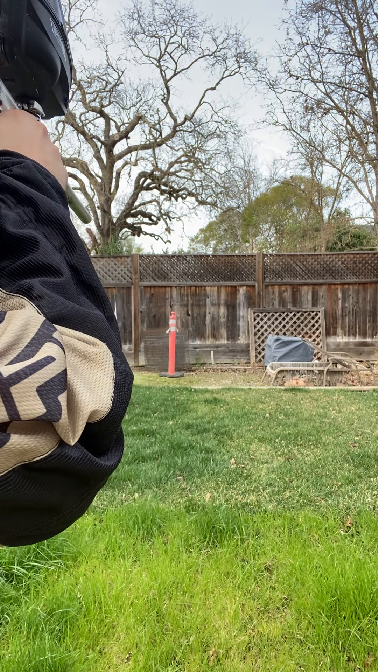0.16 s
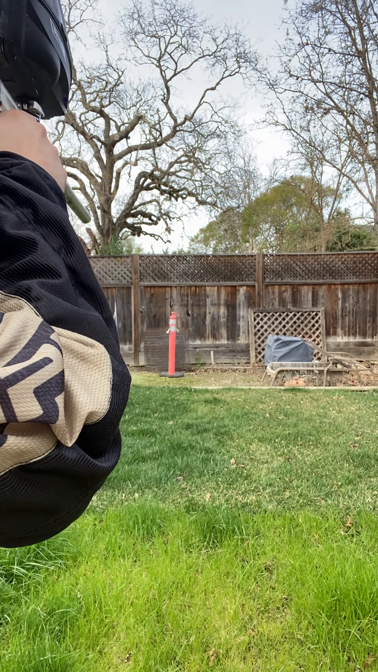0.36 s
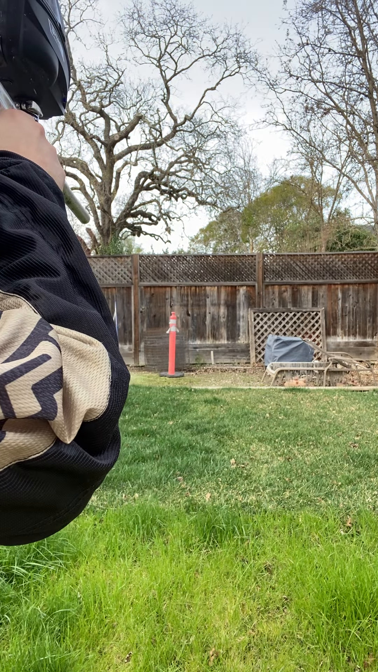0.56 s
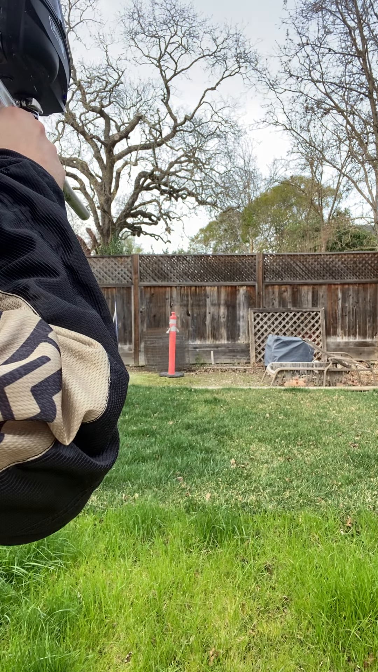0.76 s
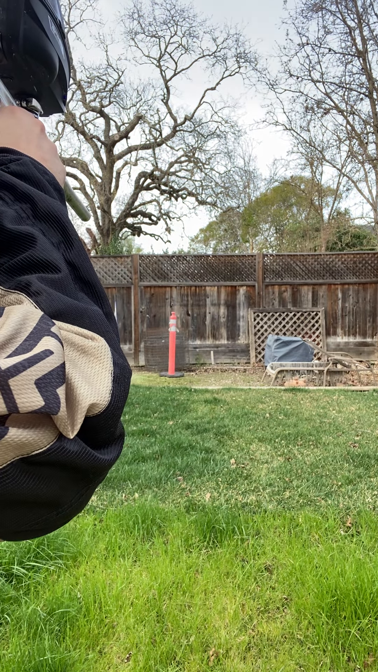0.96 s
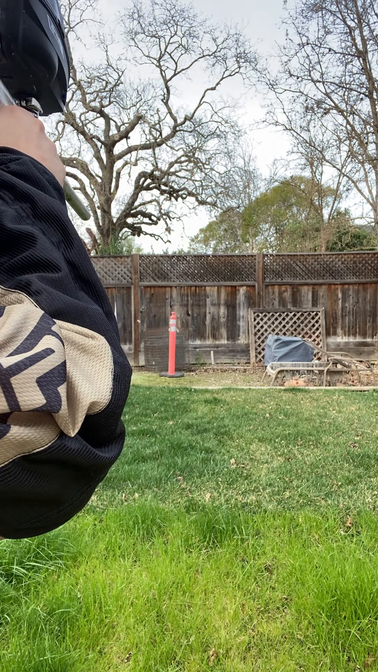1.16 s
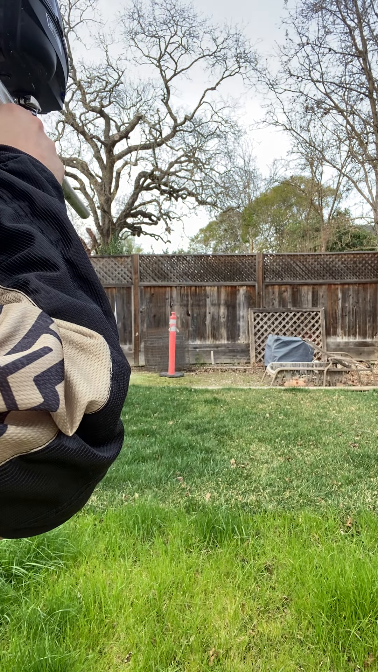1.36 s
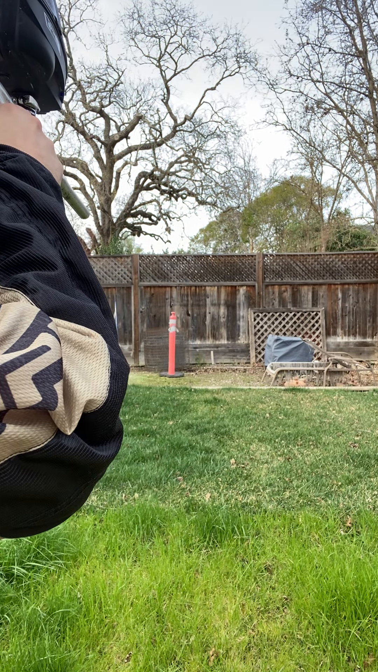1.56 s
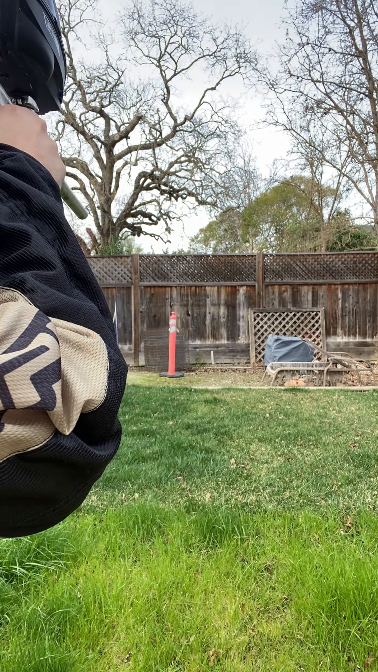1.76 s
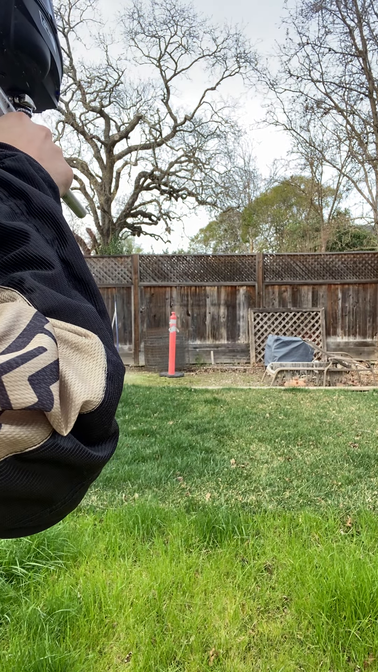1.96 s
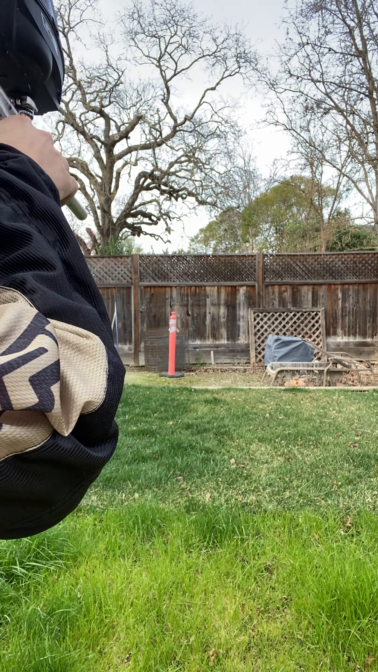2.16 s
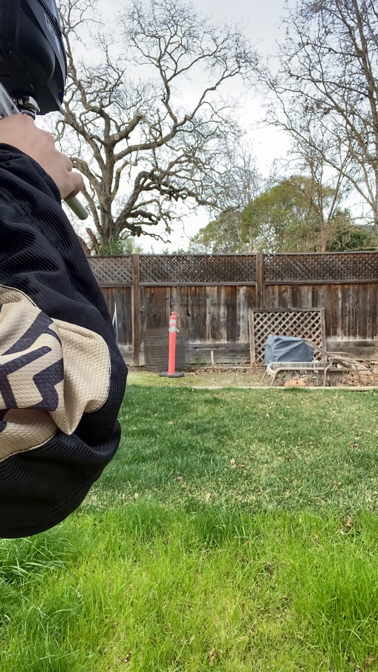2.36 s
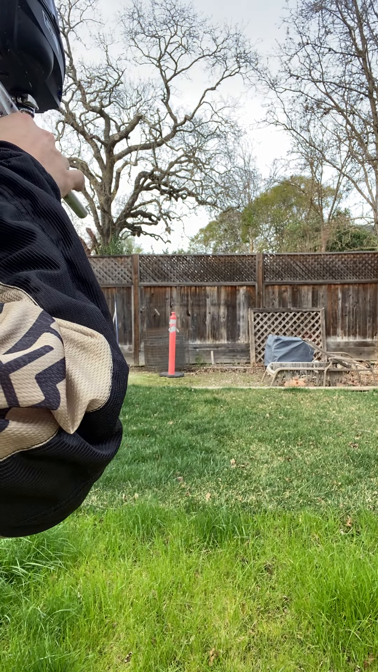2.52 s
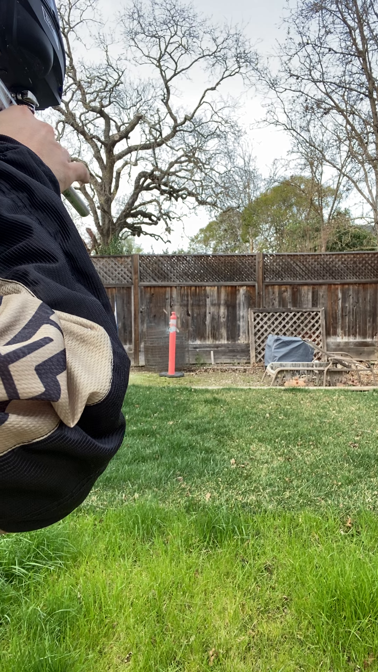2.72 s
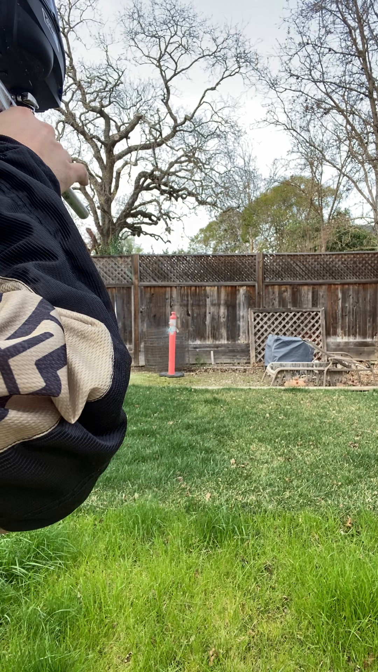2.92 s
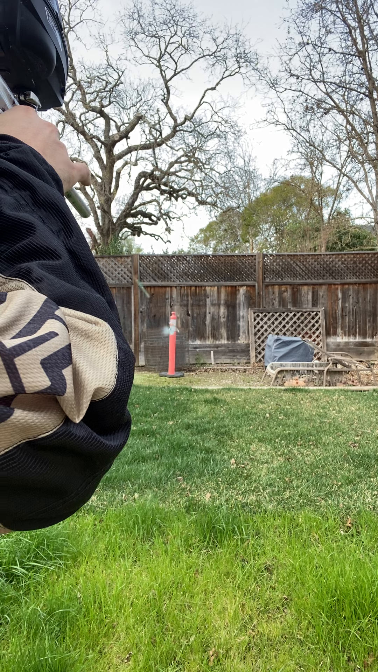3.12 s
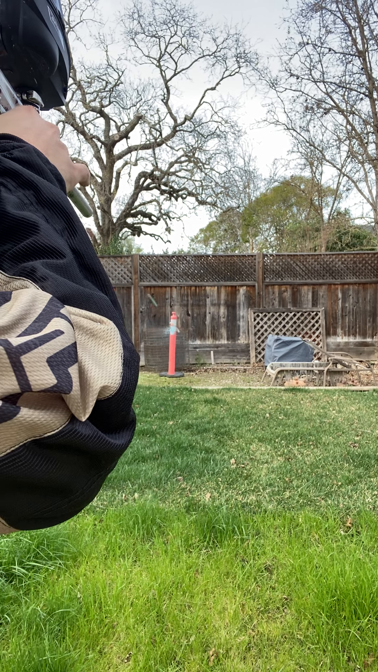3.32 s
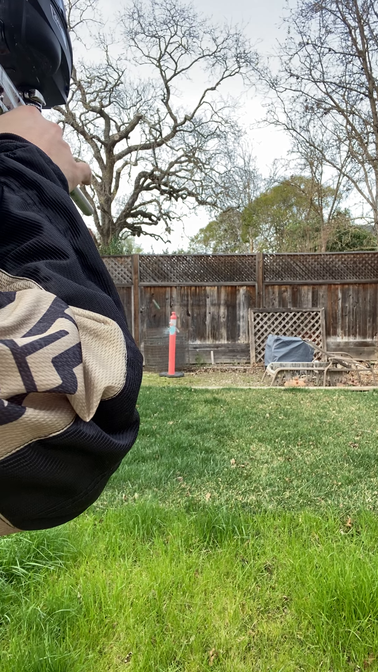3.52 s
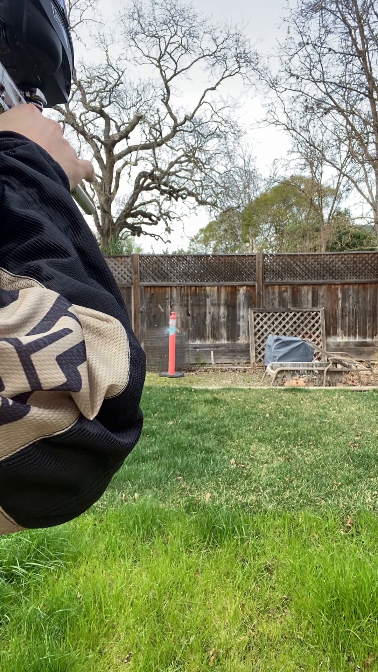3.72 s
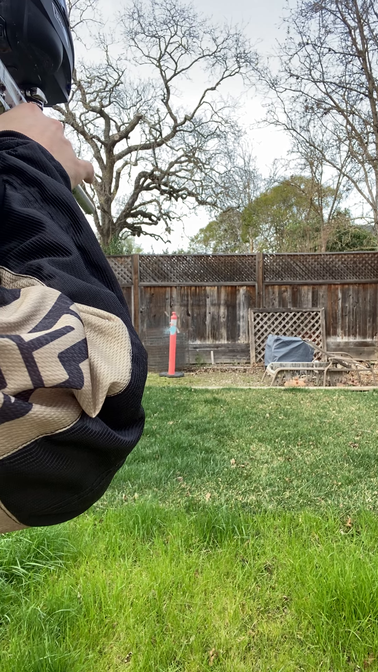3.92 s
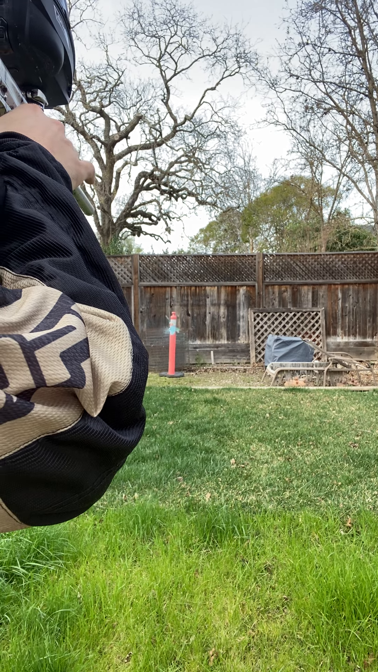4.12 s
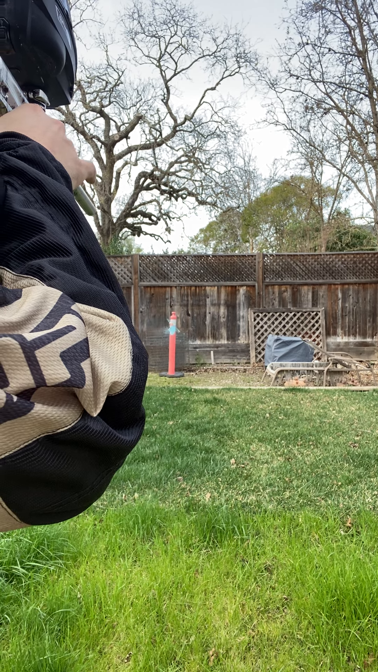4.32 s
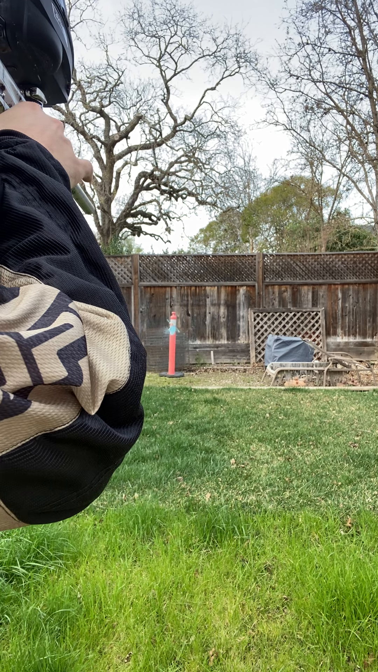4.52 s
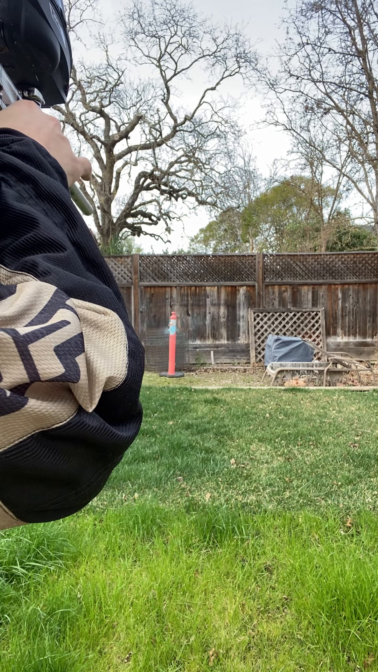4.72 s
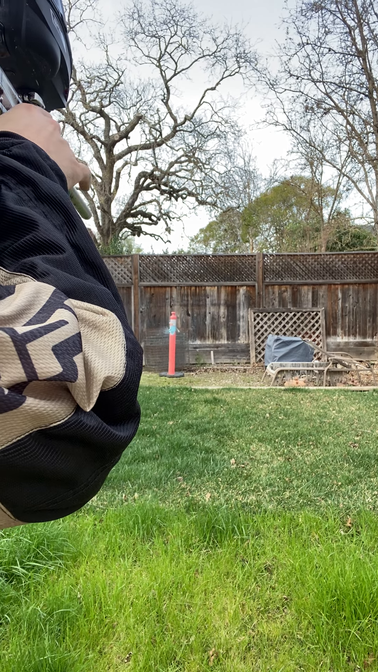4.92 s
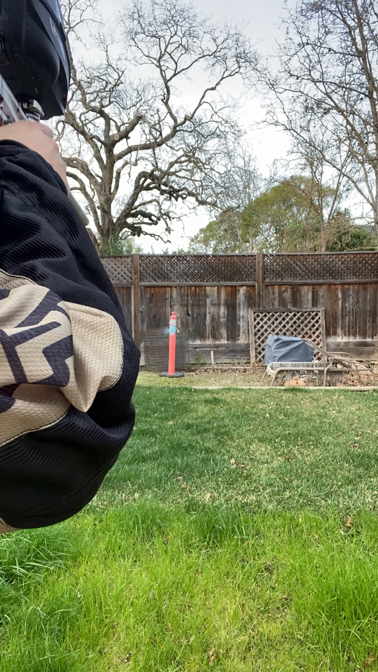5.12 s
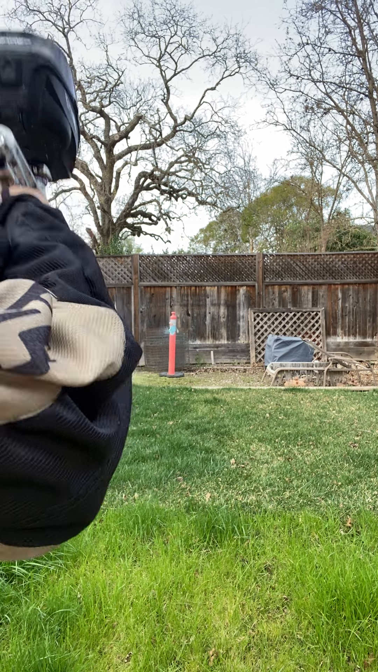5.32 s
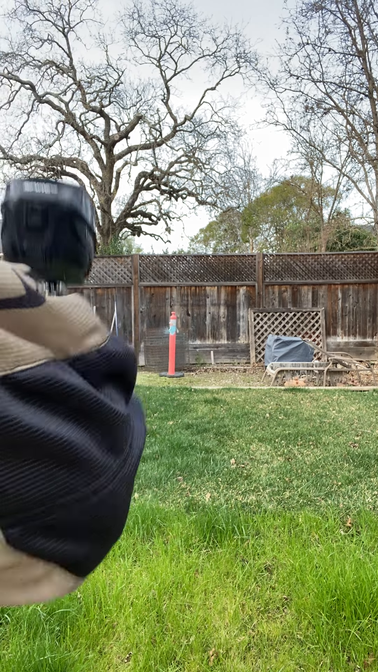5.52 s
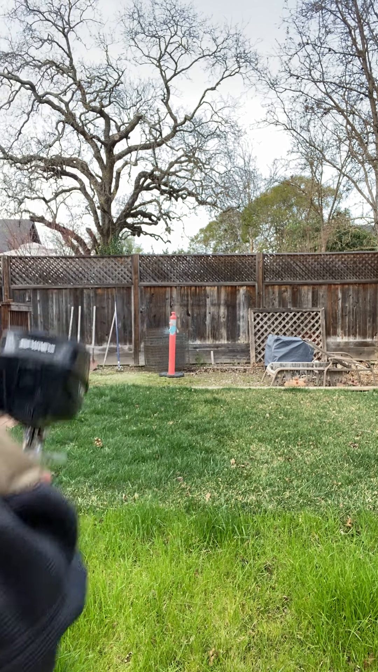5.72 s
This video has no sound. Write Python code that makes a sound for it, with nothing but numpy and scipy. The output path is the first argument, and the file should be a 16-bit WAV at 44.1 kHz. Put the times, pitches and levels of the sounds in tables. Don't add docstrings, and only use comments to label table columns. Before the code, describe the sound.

Outdoors in a fenced yard, a paintball marker beside the microphone fires two single shots, each a click, hollow gas pop and bright metallic slam, followed by a splat and knock on distant planks. After a pause comes a rapid, even string of shots at about ten per second, overlapping with fence hits and echoes. It stops abruptly, leaving faint hum, then a sleeve rub and balls rattling in the plastic hopper.

```python
import sys
import numpy as np
from scipy import signal
from scipy.fft import rfft, irfft, next_fast_len
from scipy.io import wavfile
from scipy.ndimage import uniform_filter1d

SR = 44100
rng = np.random.default_rng(int(sys.argv[2]) if len(sys.argv) > 2 else 0)


def gain_from_decibels(decibels):
    exponent = np.asarray(decibels, float) / 20
    return 10 ** exponent


def unload_wav(signal):
    wavfile.write(
        sys.argv[1],
        SR,
        np.round(np.clip(np.atleast_2d(signal).T, -1, 1) * 32767).astype(np.int16),
    )


N = 259087
LEAD = next_fast_len(N + SR // 10, True) - N
M = N + LEAD
HZ = np.fft.rfftfreq(M, 1 / SR)
T = np.arange(M) / SR
NOW = T - LEAD / SR

# start_s [s], slam_db [dB], latch_db [dB]
SHOTS = [(0.756, -12, -6), (1.3553, -6.5, -5.5), (2.5724, -10.5, -6.5), (2.6673, -9.5, -10.5),
         (2.7626, -11, -13), (2.9052, -10, -10.5), (3.0057, -11, -11), (3.1005, -11.5, -10.5),
         (3.1965, -7.5, -12), (3.2924, -8, -11), (3.3883, -7.5, -12), (3.483, -8, -12), (3.5837, -9, -11),
         (3.6788, -8.5, -12), (3.7745, -8, -11.5), (3.8689, -12, -13), (3.9655, -10, -12),
         (4.0613, -7.5, -15), (4.1572, -8.5, -13), (4.252, -9, -15), (4.348, -9, -11.5),
         (4.4434, -10.5, -15), (4.5398, -6.5, -12), (4.635, -10.5, -14), (4.7297, -10.5, -11)]


def marker():
    return latch_click() + gas_pop() + bolt_slam()


def latch_click():
    # pitch_hz [Hz], level_db [dB per Hz]
    click_colour = [(710, -23), (1200, -8.5), (2390, 0.5), (3010, -8), (4100, -9.5), (5050, -18.5),
                    (6430, -5), (8450, -16.5), (12500, -12), (14600, -19.5), (16500, -43.5)]
    # pitch_hz [Hz], level_db [dB], t60_s [s]
    body = [(316, -1.5, 0.055), (600, -2.5, 0.017), (870, 3.5, 0.0067), (1960, -8.5, 0.0093)]
    s, _, latch_db = np.transpose(SHOTS)
    click_s = s - 0.0296
    click = train(click_s, latch_db - 0.5, fall(0.0073)) + train(click_s, latch_db - 9.5, fall(0.075))
    inrush = train(click_s, latch_db + 2.0 - 0.46 * drain(s), pop(1280, 374, 0.0025, 0.0075))
    return click * noise(click_colour) + train(click_s, latch_db - 9.5, ring(body)) + inrush


def gas_pop():
    # before_slam_s [s], level_db [dB]
    puffs = [
        (0.013, -4.5),
        (0.0097, -0.5),
        (0.0044, -13),
    ]
    # pitch_hz [Hz], level_db [dB], t60_s [s]
    barrel = [(695, 1.5, 0.016), (898, -2.5, 0.018), (1500, -6.5, 0.013)]
    # pitch_hz [Hz], level_db [dB per Hz]
    gas_colour = [(710, -27.5), (1200, -10.5), (2370, -15), (2670, -9.5), (3220, -30.5), (3880, -9.5),
                  (5220, -18.5), (6570, -13.5), (12100, -20), (15800, -20), (16500, -39.5)]
    # pitch_hz [Hz], level_db [dB], t60_s [s]
    recoil = [(68, -16, 0.21), (124.2, -2, 0.058), (198.2, 4.5, 0.025)]
    # pitch_hz [Hz], level_db [dB], t60_s [s]
    frame = [(326, -10, 0.08), (470, -7.5, 0.011), (604, -2.5, 0.03), (810, -3, 0.018)]
    s = np.transpose(SHOTS)[0]
    pop_db = -9.5 - drain(s)
    out = train(s - 0.0149, pop_db + 9.5, pop(950, 340, 0.0017, 0.0118))
    for before_s, db in puffs:
        scatter_db = 3 * rng.standard_normal(len(s))
        out += train(s - before_s, pop_db + db + 2.5 + scatter_db, ring(barrel))
    out += train(s - 0.0012, pop_db + 0.2, ring(recoil))
    out += train(s + 0.0032, pop_db - 1.0, ring(frame))
    hiss = train(s - 0.015, pop_db - 14, fall(0.17, rise=0.0019))
    hiss += train(s - 0.0105, pop_db + 3.5, fall(0.008))
    return out + hiss * noise(gas_colour)


def bolt_slam():
    # pitch_hz [Hz], level_db [dB per Hz]
    slam_colour = [(880, -31), (1500, 1), (2770, -14), (4130, -9.5), (4950, -9), (7930, -5.5), (9130, -3),
                   (10300, 3.5), (13400, -17), (14200, -24.5), (16500, -34.5)]
    s, slam_db, _ = np.transpose(SHOTS)
    slam = train(s + 0.00071, slam_db + 6.0, fall(0.0038)) + train(s, slam_db - 14, fall(0.015))
    return slam * noise(slam_colour)


def pop(start_hz, end_hz, glide_s, open_s):
    t = T[:SR // 20]
    turns = end_hz * t + (start_hz - end_hz) * glide_s * (1 - np.exp(-t / glide_s))
    shut = np.exp(-np.maximum(t - open_s, 0) / 0.0009)
    return np.sin(2 * np.pi * turns) * (1 - np.exp(-t / 0.0084)) * np.exp(-t / 0.022) * shut


def drain(s):
    loss_db, refill_s = 0.95, 0.53
    since = np.asarray(s)[:, None] - np.transpose(SHOTS)[0]
    return loss_db * np.sum((since > 0.01) * np.exp(-np.abs(since) / refill_s), axis=1)


def fence():
    # start_s [s], knock_db [dB], boom_db [dB]
    hits = [(0.87, -20.5, -30.5), (1.471, -7.5, -15), (2.693, -28.5, -32), (2.791, -14, -21.5),
            (2.885, -10, -20.5), (3.026, -10, -13.5), (3.125, -9.5, -16.5), (3.222, -31, -24),
            (3.318, -11.5, -19.5), (3.411, -10, -17.5), (3.51, -16.5, -18.5), (3.606, -11.5, -17.5),
            (3.699, -9.5, -19), (3.795, -30.5, -39), (3.892, -10, -26.5), (3.995, -12.5, -17.5),
            (4.083, -21, -34), (4.18, -11.5, -21), (4.277, -13.5, -21.5), (4.375, -16, -26.5),
            (4.465, -11, -19.5), (4.563, -10.5, -26), (4.66, -13, -25), (4.757, -20, -29.5),
            (4.852, -11.5, -24)]
    # knock_db [dB], boom_db [dB]
    earlier_hit = (-9, -16.5)
    # start_s [s], level_db [dB]
    cone = [
        (0.87, -19.5),
        (2.693, -21),
    ]
    # lag_s [s], level_db [dB]
    ground = [
        (0, 0),
        (.008, -3),
        (.0155, -13),
        (.021, -13),
    ]
    # pitch_hz [Hz], level_db [dB per Hz]
    splat_colour = [(1060, -35), (1800, 0), (3350, -5), (5280, -10), (6060, -8), (7930, -14), (9730, -12),
                    (12800, -16.5), (16500, -56)]
    # pitch_hz [Hz], level_db [dB per Hz]
    crack_colour = [(900, -19), (1800, -9), (3800, 1), (5500, -8), (9000, -6), (12800, -14), (16500, -49.5)]
    # pitch_hz [Hz], level_db [dB], t60_s [s]
    plank = [(798, 7, 0.0059), (1051, 11, 0.0084), (1411, 8, 0.013), (1750, 1.5, 0.012), (2450, -2, 0.012)]
    # pitch_hz [Hz], level_db [dB], t60_s [s]
    posts = [(127, -4, 0.21), (152.9, 6, 0.091), (201.3, -5.5, 0.097), (269.8, 2, 0.096),
             (375.7, -4.5, 0.085), (528, -0.5, 0.084), (630, 0.5, 0.053)]
    s, knock_db, boom_db = np.transpose([(-0.0155, *earlier_hit)] + list(hits))
    splat_db = -15 + 0.44 * knock_db - 0.81 * drain(s - 0.1)
    cone_s, cone_db = np.transpose(cone)
    rough = 1 + 0.5 * rng.standard_normal(M)
    push = fall(0.002) / fall(0.002).sum()
    out, white, bright = 0, noise(splat_colour), noise(crack_colour)
    for lag, db in ground:
        splat = train(s + lag, splat_db + db + 8.5, fall(0.013))
        splat += train(s + lag, splat_db + db - 6.0, fall(0.04))
        crack = train(cone_s + lag, cone_db + db + 10, fall(0.0091))
        crack += train(cone_s + lag, cone_db + db - 6, fall(0.069))
        knock = rough * train(s + lag, knock_db + db + 5.0, push)
        out += white * splat + bright * crack
        out += signal.fftconvolve(knock, ring(plank, -1))[:M]
    swell = 1 - np.exp(-T[:SR // 4] / 0.009)
    return out + train(s + 0.003, boom_db + 4.5, swell * ring(posts))


def cone_rocking():
    # peak_s [s], level_db [dB], half_length_s [s]
    rocking = (1.07, -45, .065)
    peak_s, db, half_s = rocking
    swell = gain_from_decibels(db + 3.3 * walk(60)) * np.exp(-((NOW - peak_s) / half_s) ** 2)
    colour = [(150, -21), (300, -4.5), (600, -2.5), (1200, -6), (3000, -14), (9000, -40)]
    return spread(swell * noise(colour), swell * noise(colour))


def yard(x, first_s, round_s, echo_db, loss_db, wet_db, rise_s):
    # pitch_hz [Hz], t60_s [s]
    yard_t60 = [(60, 0.86), (250, 0.47), (1000, 0.57), (3000, 0.58), (6000, 0.36), (12000, 0.47)]
    # pitch_hz [Hz], level_db [dB]
    yard_colour = [(40, -19), (130, -5), (220, -5), (500, 3), (1100, 0), (2000, -2.5), (3000, -0.5),
                   (8000, -3.5), (14000, -20), (16500, -47)]
    t, colour, tails = T[:SR], gain_from_decibels(on_log(yard_colour, HZ)), []
    for side in range(2):
        tail = np.zeros(SR)
        for hz in 60 * 2. ** np.arange(9):
            edges = [hz / np.sqrt(2), min(hz * np.sqrt(2), 0.49 * SR)]
            band = signal.butter(3, edges, "band", fs=SR, output="sos")
            decay = np.exp(-np.log(1000) * t / on_log(yard_t60, hz))
            tail += signal.sosfilt(band, rng.standard_normal(SR)) * decay
        lumps = gain_from_decibels(3 * uniform_filter1d(rng.standard_normal(SR), 36) * 6)
        tail *= gain_from_decibels(wet_db) * lumps * (1 - np.exp(-(t / rise_s) ** 2))
        for k in range(4):
            tail[int((first_s + k * round_s) * SR) + 9 * side] += gain_from_decibels(echo_db - k * loss_db - 4 * side)
        tails.append(irfft(rfft(signal.fftconvolve(x, tail)[:M]) * colour, M))
    return spread(*tails)


def leak():
    # pitch_hz [Hz], level_db [dB per Hz]
    leak_colour = [(880, -39), (1500, -15), (2580, -33.5), (2730, -2), (3080, -13), (3680, 2), (4870, -29),
                   (6750, -12), (10500, -22.5), (11800, -25), (14000, -64)]
    gate = (NOW > 0.9) * (NOW < 1.326) * gain_from_decibels(-64.5 - 13 * (NOW - 1.87))
    return spread(gate * noise(leak_colour), gate * noise(leak_colour))


def hopper():
    # start_s [s], level_db [dB], pitch_hz [Hz], tick_db [dB above the knock]
    rattle = [(5.517, -62, 500, -4.5), (5.564, -56.5, 931, -29.5), (5.58, -53, 628, -12),
              (5.609, -51.5, 1000, -17), (5.623, -44.5, 573, -22.5), (5.659, -41.5, 830, -27),
              (5.679, -65, 454, -25.5), (5.678, -41, 554, -19), (5.711, -42.5, 901, -24.5),
              (5.729, -48, 900, -23), (5.746, -46, 583, -19.5), (5.764, -47, 610, -28),
              (5.802, -45, 487, -36.5), (5.819, -47, 510, -32.5), (5.85, -47, 600, -28),
              (5.862, -43.5, 960, -22.5)]
    # start_s [s], level_db [dB]
    dry_ticks = [
        (0.3381, -64),
        (0.3777, -57),
        (1.7488, -37.5),
        (1.8236, -41.5),
        (1.9978, -61),
        (2.2395, -64),
        (5.2316, -61.5),
        (5.267, -66),
        (5.5233, -56),
    ]
    out = 0
    for start_s, level_db, hz, _ in rattle:
        shell = [(hz, 0, 0.035), (1.3 * hz, -4, 0.04), (0.89 * hz, -4, 0.06), (1.9 * hz, -8, 0.04),
                 (2300, -14, 0.02)]
        out += train([start_s], [level_db], ring(shell, -1))
    s, db, _, tick_db = np.transpose(rattle)
    ticks = train(s, db + tick_db + 9, fall(0.018)) + train(*np.transpose(dry_ticks), fall(0.038))
    colour = [(300, -14.5), (1000, 0), (3500, -7.5), (5500, -17.0), (10000, -36), (15000, -27.5)]
    return out + ticks * noise(colour)


def sleeve():
    # peak_s [s], level_db [dB], half_length_s [s]
    moves = [
        (5.279, -73, 0.1),
        (5.511, -69.5, 0.05),
        (5.725, -69, 0.14),
    ]
    cloth = [(1500, -17.0), (3000, -3.0), (5000, 0.5), (8000, -3), (11000, -9.5), (14000, -39.0)]
    grain = gain_from_decibels(2.8 * uniform_filter1d(rng.standard_normal(M), 100) * 10)
    rub = grain * sum(gain_from_decibels(db - 3.0) * np.exp(-np.abs(NOW - peak_s) / half_s) for peak_s, db, half_s in moves)
    return spread(rub * noise(cloth), rub * noise(cloth))


def wind():
    # time_s [s], level_db [dB]
    breeze = [(0, -54), (0.7, -57.5), (1.3, -52), (1.9, -55), (2.5, -53.5), (5.1, -71.5), (5.5, -65),
              (5.87, -67)]
    # start_s [s], level_db [dB], pitch_hz [Hz], length_s [s]
    bump = (2.27, -30, 64, .075)
    gust_db = 3 * walk(18)
    colour = [(10, -32.5), (25, -11.0), (45, 2.5), (60, 1.5), (120, -1.5), (170, -18), (400, -51.5)]
    rumble = gain_from_decibels(np.interp(NOW, *np.transpose(breeze)) + gust_db) * noise(colour)
    start_s, db, hz, length_s = bump
    t = T[:int(length_s * SR)]
    return rumble + train([start_s], [db], np.sin(2 * np.pi * hz * t) * np.hanning(len(t)))


def town():
    # time_s [s], level_db [dB]
    hum = [(0.3, -59.5), (0.65, -64.5), (1.15, -59), (1.9, -64.5), (2.5, -66.5), (5.2, -72), (5.55, -69),
           (5.7, -62.5), (5.87, -67.5)]
    # pitch_hz [Hz], level_db [dB per Hz]
    town_colour = [(120, -22.5), (200, -5), (400, -8.5), (1200, -9.5), (1800, -20), (3200, -28.5),
                   (6000, -42.5), (9000, -55.5), (14000, -90)]
    town_db = np.interp(NOW, *np.transpose(hum)) + 0.72 * walk(3)
    return gain_from_decibels(town_db + 2.0) * spread(noise(town_colour), noise(town_colour))


def on_log(points, hz):
    f, v = np.transpose(points)
    return np.interp(np.log(hz + 1), np.log(f + 1), v)


def noise(points):
    x = irfft(rfft(rng.standard_normal(M)) * gain_from_decibels(on_log(points, HZ)), M)
    return x / x.std()


def train(s, db, shape):
    x = np.zeros(M + len(shape))
    starts = np.round(np.asarray(s) * SR).astype(int) + LEAD
    for start, gain in zip(starts, gain_from_decibels(np.asarray(db))):
        x[start:start + len(shape)] += gain * shape
    return x[:M]


def fall(t60, rise=0.00018):
    t = T[:int(t60 * SR * 1.2)]
    return (1 - np.exp(-t / rise)) * 1000. ** (-t / t60)


def ring(modes, flip=1):
    t = T[:SR // 4]
    out = np.zeros(len(t))
    for k, (hz, db, t60) in enumerate(modes):
        out += flip ** k * gain_from_decibels(db) * np.sin(2 * np.pi * hz * t) * np.exp(-np.log(1000) * t / t60)
    return out


def walk(rate):
    k = int(SR / rate)
    return 0.63 * uniform_filter1d(np.repeat(rng.standard_normal(SR // 50), k)[:M], k)


def ports(x, balance):
    # pitch_hz [Hz], lag_rad [radians]
    left_lag = [(0, 0), (200, 0), (380, .4), (620, -1.1), (950, -.7), (1400, 1.7), (2300, 2), (3100, 4.4),
                (3800, 6.3), (4800, 7.3), (6000, 6.6), (10000, 7.8), (12500, 8.9), (22050, 8.9)]
    half = np.exp(-0.5j * np.interp(HZ, *np.transpose(left_lag))) * gain_from_decibels(on_log(balance, HZ) / 2)
    return irfft(rfft(x) * np.array([half, 1 / half]), M)


def spread(mid, side):
    # pitch_hz [Hz], side_minus_mid_db [dB]
    diffuse = [(60, -26), (110, -25), (200, -15), (380, -5), (700, 1), (1290, 1), (2380, 4), (4400, -1),
               (8120, -6), (15000, 10)]
    side = irfft(rfft(side) * gain_from_decibels(on_log(diffuse, HZ)), M)
    return np.array([mid + side, mid - side])


def scene():
    # pitch_hz [Hz], left_minus_right_db [dB]
    near_balance = [(200, 0), (300, 0), (550, -6), (950, 6), (1500, 0), (2200, 0), (2700, -6), (3200, 1),
                    (4000, 1), (8000, 0)]
    # pitch_hz [Hz], left_minus_right_db [dB]
    far_balance = [(200, 0), (300, -1), (620, -7), (900, 0), (1350, 9), (2200, 0), (2700, 6), (3200, 2),
                   (3600, 3), (6000, 0)]
    no_bass = signal.butter(4, 56, "high", fs=SR, output="sos")
    gun, balls = signal.sosfilt(no_bass, [marker(), fence()])
    gun = gun + hopper()
    direct = ports(gun, near_balance) + ports(balls, far_balance)
    round_s = 0.0885
    wet = yard(gun, 0.056, round_s, echo_db=-22.5, loss_db=7.3, wet_db=-45, rise_s=0.025)
    wet += yard(balls, 0.089, round_s, echo_db=-17, loss_db=8, wet_db=-38, rise_s=0.002)
    return (direct + wet + cone_rocking() + leak() + sleeve() + wind() + town())[:, LEAD:]


def top_cut(x):
    return signal.sosfilt(signal.butter(12, 17020, fs=SR, output="sos"), x)


def record(dry):
    mix = np.tanh(1.044 * dry) / 0.98
    return top_cut(mix)


dry = scene()
out = record(dry)
unload_wav(out)
```